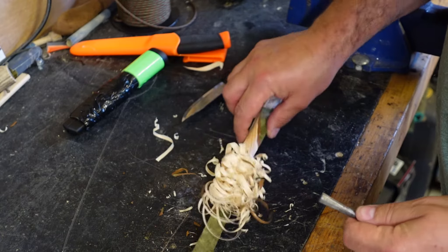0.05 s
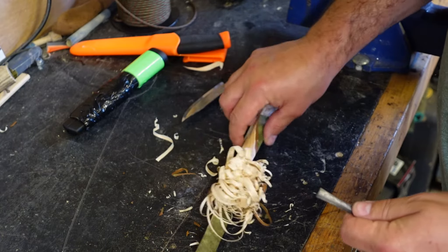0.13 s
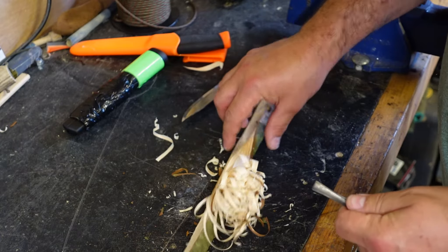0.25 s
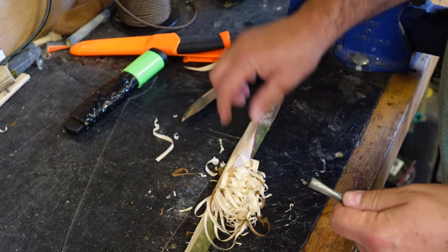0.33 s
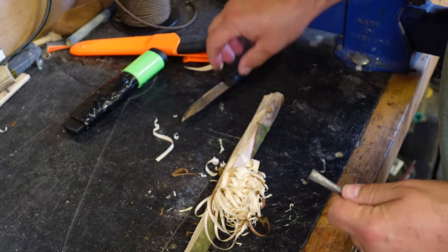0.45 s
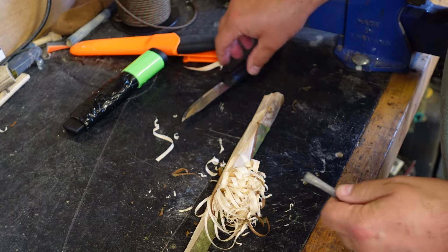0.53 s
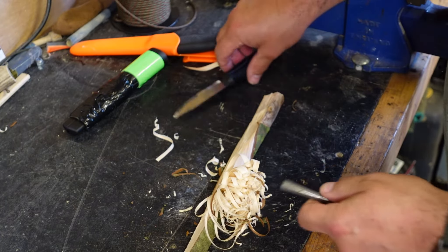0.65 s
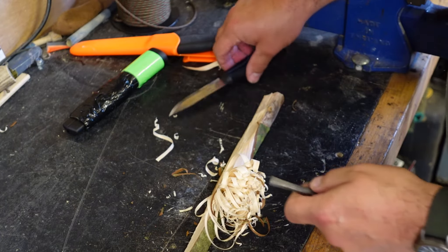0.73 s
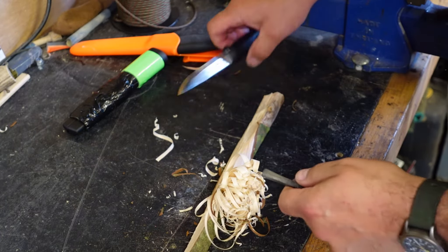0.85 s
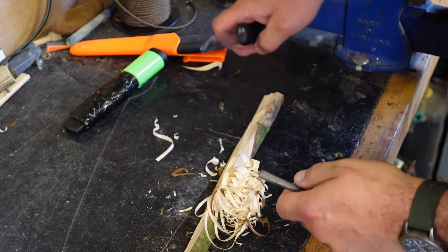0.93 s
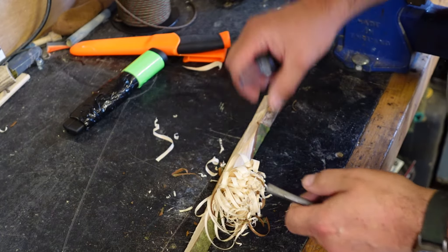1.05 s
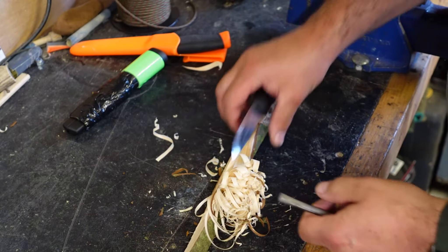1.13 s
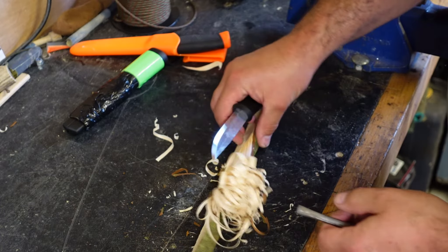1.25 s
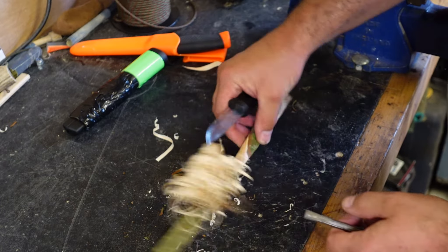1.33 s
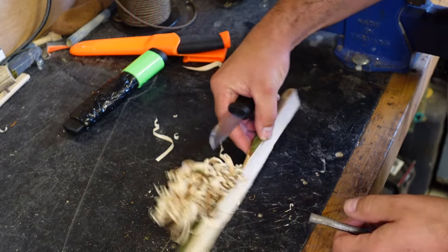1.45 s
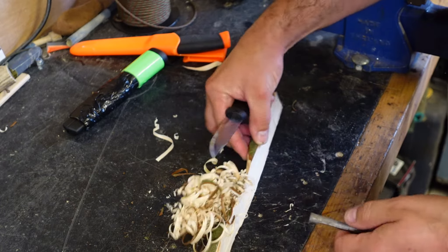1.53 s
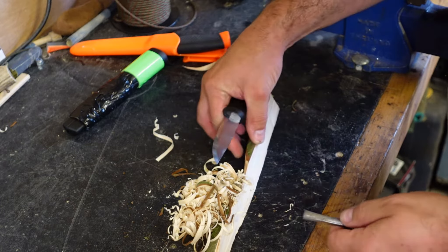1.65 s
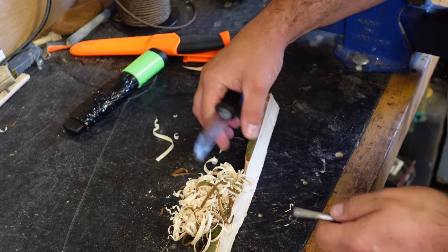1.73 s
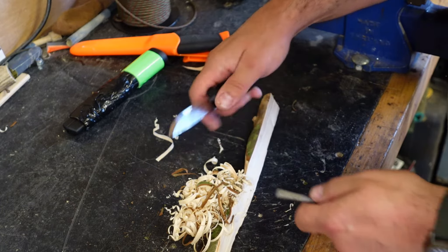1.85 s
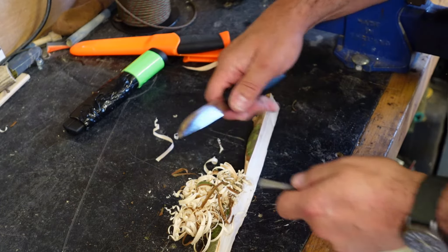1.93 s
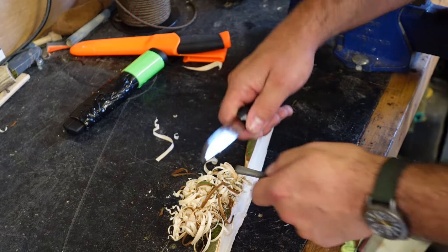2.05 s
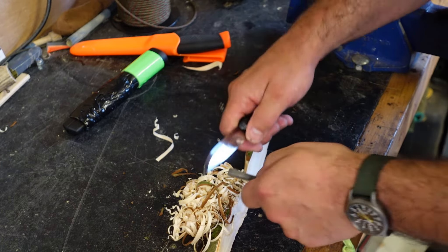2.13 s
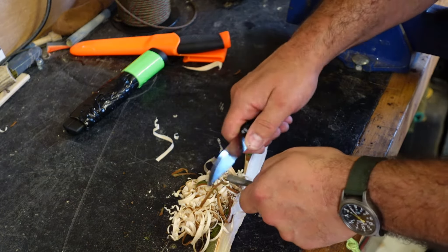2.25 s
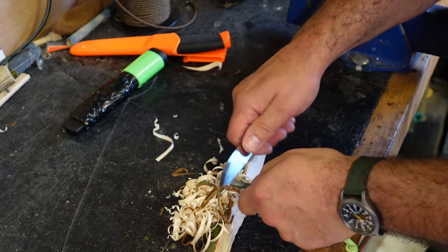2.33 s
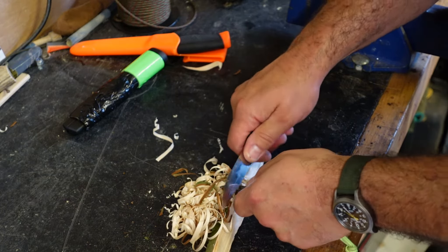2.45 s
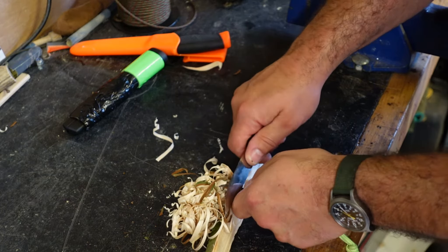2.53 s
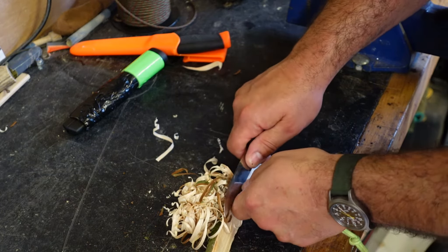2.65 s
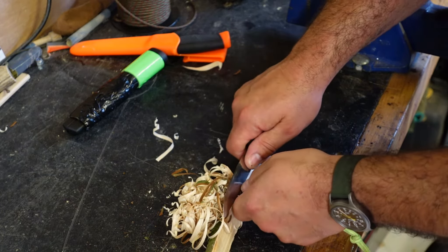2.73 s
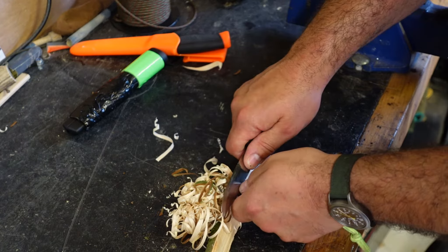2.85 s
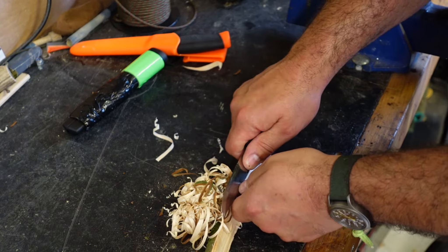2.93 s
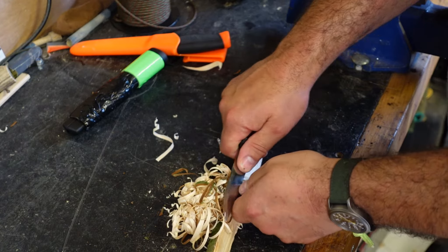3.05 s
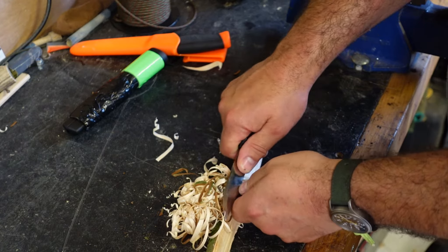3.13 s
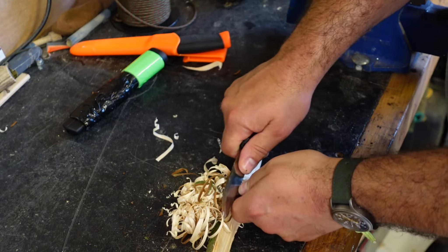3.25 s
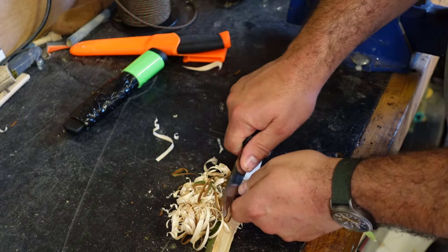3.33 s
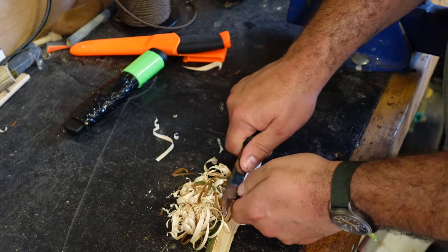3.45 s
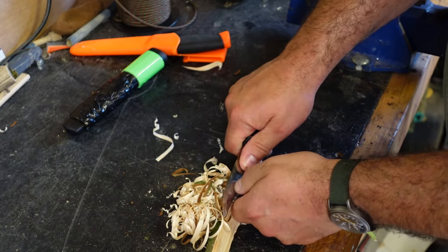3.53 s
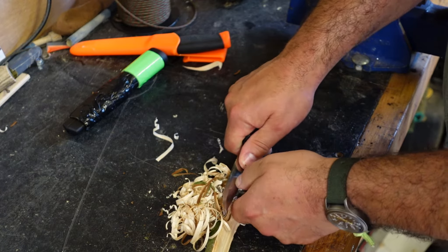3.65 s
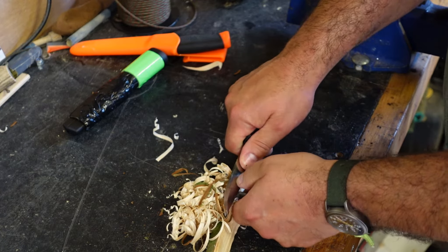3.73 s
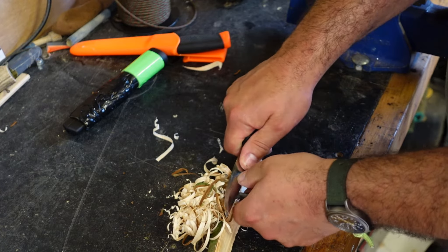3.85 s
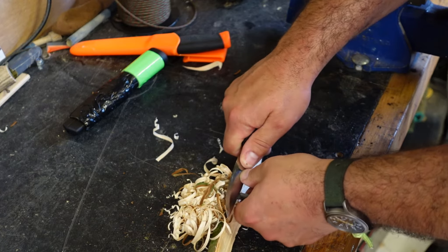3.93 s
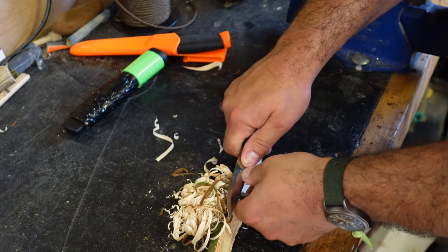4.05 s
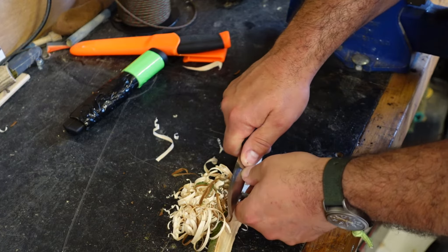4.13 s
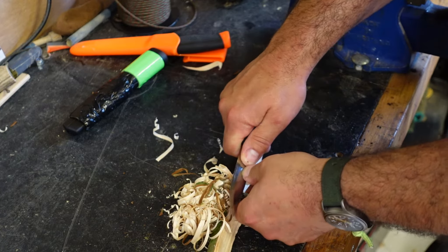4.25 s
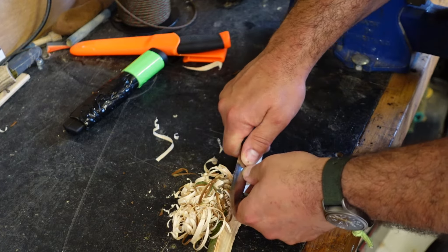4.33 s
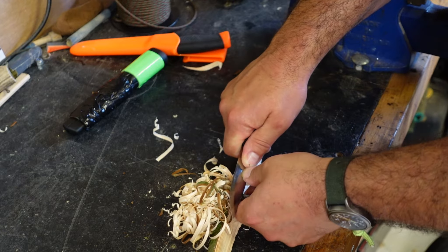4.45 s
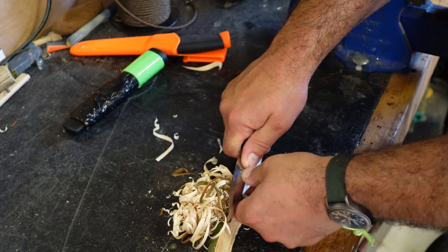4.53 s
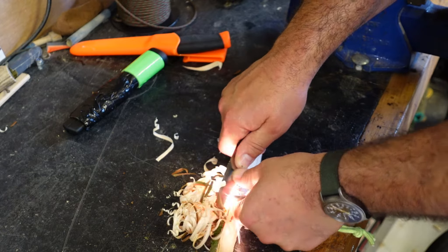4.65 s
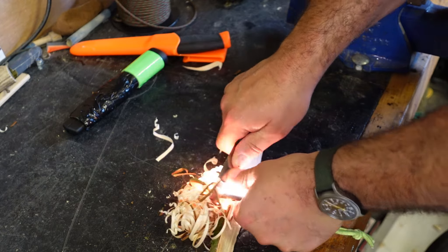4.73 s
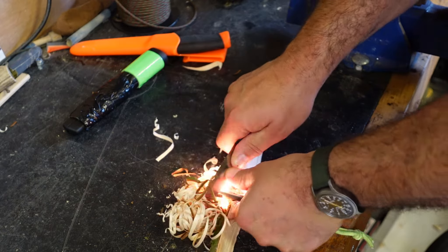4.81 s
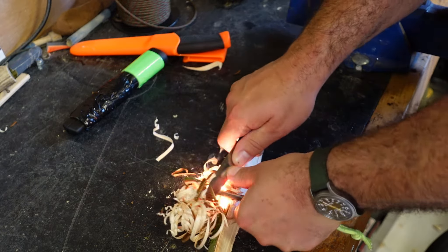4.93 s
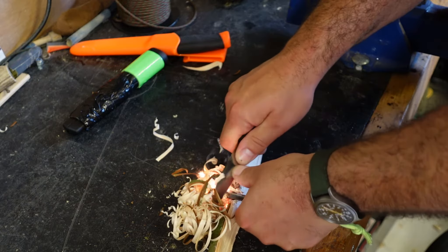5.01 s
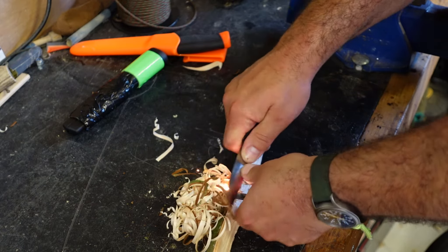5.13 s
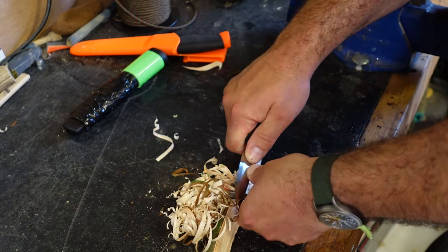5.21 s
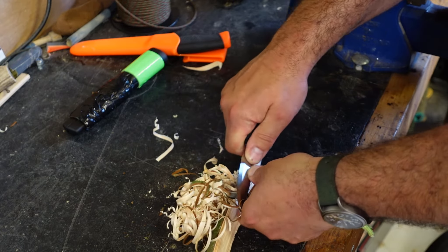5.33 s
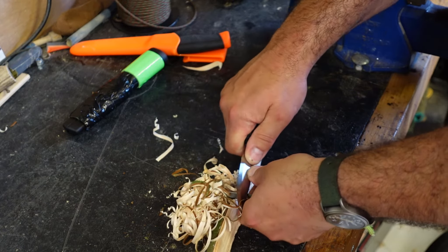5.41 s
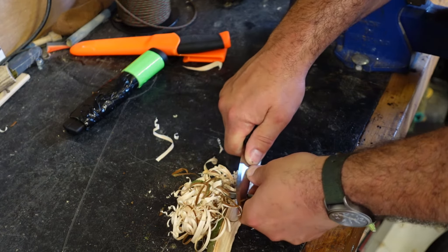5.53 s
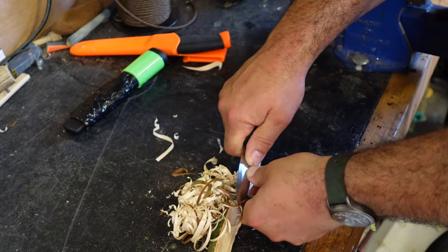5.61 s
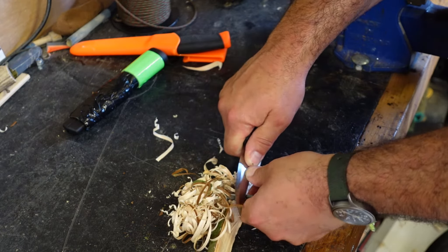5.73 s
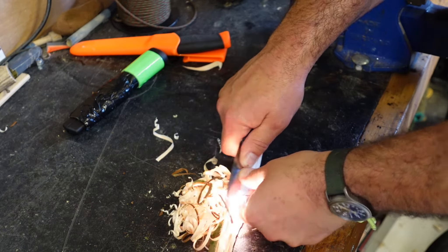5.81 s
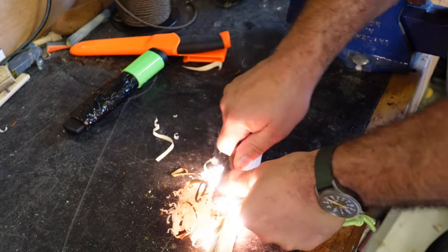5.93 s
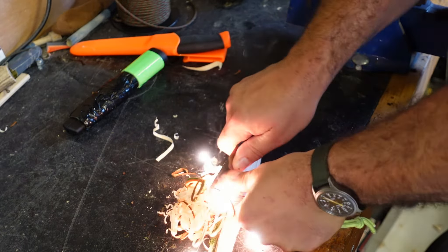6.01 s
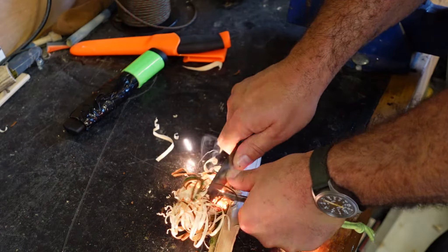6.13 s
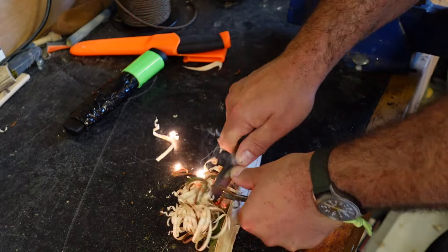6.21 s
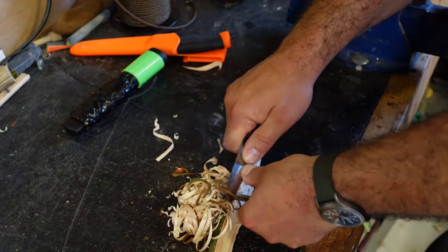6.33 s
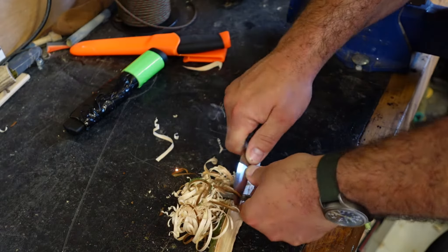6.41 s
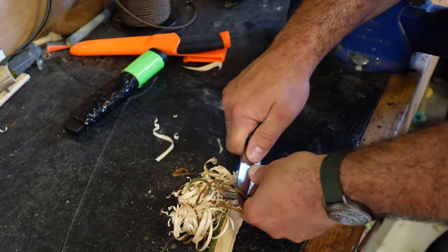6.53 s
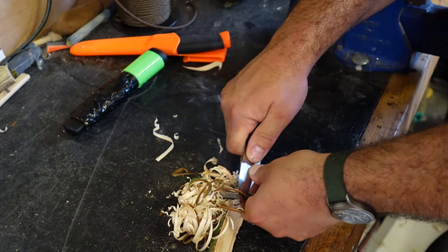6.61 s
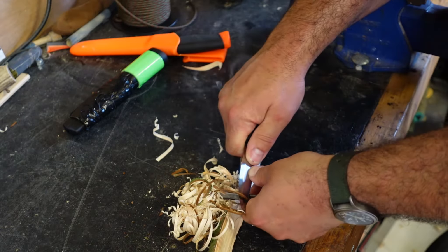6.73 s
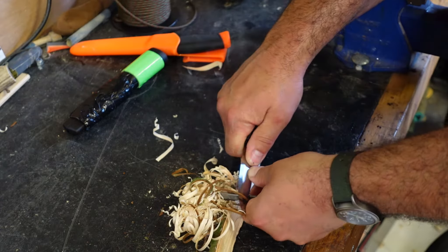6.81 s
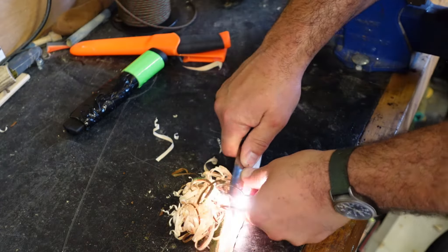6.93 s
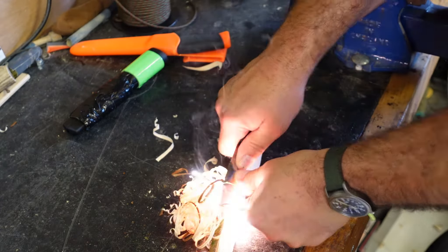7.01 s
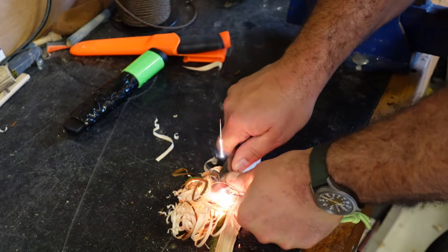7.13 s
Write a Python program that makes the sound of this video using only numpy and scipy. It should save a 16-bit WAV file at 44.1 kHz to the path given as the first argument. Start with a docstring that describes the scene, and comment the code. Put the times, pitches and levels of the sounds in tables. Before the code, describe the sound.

Close stereo in a small, quiet workshop. A dry wooden stick slides over a rubber-topped bench with brief hiss and light knocks, twice. Then a steel blade shifts among curled shavings with faint crisp rustles and tiny ticks. Finally the knife spine is dragged hard down a spark rod three times, each a loud, bright, jerky rasp with wood and steel ringing shortly, small crackles between.

```python
"""Knife spine on a spark rod

On a rubber-topped workbench a dry feathered stick is slid and set down, a knife is lined up among the shavings,
then its spine is dragged hard down a spark rod three times. Uneven jerks of gritty noise ring blade, rod, stick
and bench as banks of decaying modes; slides, rustles, knocks and ticks drive the same kinds of modes with noise.
A faint hollow hum, chirps and room tone lie behind, in a small quiet workshop with a close stereo microphone."""
import sys
import numpy as np
from scipy import signal
from scipy.fft import rfft, irfft
from scipy.io import wavfile
from scipy.ndimage import uniform_filter1d

SR = 44100
rng = np.random.default_rng(int(sys.argv[2]) if len(sys.argv) > 2 else 0)


def gain_from_decibels(decibels):
    """Convert decibel values to linear amplitude factors."""
    exponent = np.asarray(decibels, float) / 20
    return 10 ** exponent


def materialize(psi):
    """Save the field psi as 16-bit PCM at rate SR to the path in sys.argv[1].

    A 1-D psi becomes a single channel; in a 2-D psi each row is a channel.
    """
    bounded = np.clip(np.atleast_2d(psi).T, -1, 1)
    quanta = np.round(bounded * 32767).astype(np.int16)
    wavfile.write(sys.argv[1], SR, quanta)


N = 316197
T = np.arange(N) / SR  # time in seconds

# Blade held among the shavings or against the rod. Each row: mode in Hz, relative level in dB, t60 in seconds.
BLADE_MODES = [(2944, -5.5, 0.027), (3396, -3, 0.0082), (3994, 2, 0.011), (4370, -2, 0.0043),
               (4560, 4.5, 0.0097), (5050, -2, 0.0018), (5610, -7, 0.086), (6520, -38, 0.036),
               (8440, -8, 0.0095), (9200, -6, 0.008)]
# Stick pressed by the work, low to high. Each row: mode in Hz, relative level in dB, t60 in seconds.
STICK_MODES = [(543, -11, 0.047), (652.5, -6, 0.046), (900, -1, 0.013), (1148, 1.5, 0.029),
               (1207.5, 0, 0.012), (1519, 3, 0.018), (1780, 1.5, 0.031), (2317, 2, 0.0059)]
# Upper wood ring of the stick. Each row: mode in Hz, relative level in dB, t60 in seconds.
STICK_TOP_MODES = [(2620, 6, 0.036), (3400, -18, 0.033), (3600, -4, 0.06), (3953, 9.5, 0.017),
                   (4920, 0, 0.013), (5450, -5.5, 0.068), (7100, -9, 0.027)]
# Stick lying loose. Each row: mode in Hz, relative level in dB, t60 in seconds.
STICK_LOOSE_MODES = [(585, -5, 0.026), (658, 2, 0.044), (815, -3, 0.01), (1087, -3, 0.046),
                     (1245, -1.5, 0.022), (1472, -0.5, 0.017), (1594, -1, .03), (2030, -9, 0.0226)]
# Bench top. Each row: mode in Hz, relative level in dB, t60 in seconds.
BENCH_MODES = [(76.5, -16.5, .12), (90.2, -10.5, 0.31), (127, -5, 0.099), (245, -4, 0.024),
               (382, -5, 0.014), (491, -4, 0.054)]
# Tone of wood rubbing or cracking on the mat. Each row: frequency in Hz, gain in dB.
RUB_TONE = [(1500, -24), (3000, -9.5), (4500, -6.5), (5800, -2), (7500, -8.5), (11000, -9), (16000, -14.5)]
# Tone of crisp shavings and bright snaps. Each row: frequency in Hz, gain in dB.
CRISP_TONE = [(1200, -17.5), (2200, -11.5), (3500, -3), (5500, 2.5), (9000, 0.5), (13000, -1), (16000, -8)]


def unit(x):
    """Scale to rms 1."""
    return x / np.sqrt(np.mean(x ** 2))


def colour(x, points):
    """Causal filter through (Hz, dB) points, from the cepstrum of the log gain."""
    hz, db = np.transpose(points)
    bin_hz = np.arange(2049) * SR / 4096
    log_gain = np.interp(np.log(bin_hz + 1), np.log(hz), db) * np.log(10) / 20
    cepstrum = irfft(log_gain)
    # folding the cepstrum forward in time gives minimum phase
    cepstrum[1:2048] *= 2
    cepstrum[2049:] = 0
    return signal.fftconvolve(x, irfft(np.exp(rfft(cepstrum))))[:N]


def ring(x, modes):
    """Sum of decaying resonances, neighbours in opposite phase, scaled to unit energy."""
    t = T[:SR // 2]
    response = 0
    for k, (hz, db, t60) in enumerate(modes):
        decay = np.exp(-np.log(1000) * t / t60) / np.sqrt(t60)  # short modes start stronger
        response = response + (-1) ** k * gain_from_decibels(db) * np.sin(2 * np.pi * hz * t) * decay
    return signal.fftconvolve(x, response / np.sqrt(np.sum(response ** 2)))[:N]


def tracks(tables):
    """Turns the dB columns of (s, dB, ..) tables into gains over time, silent outside each table's span."""
    out = 0
    for table in tables:
        s, *columns = np.transpose(table)
        on = uniform_filter1d(1. * ((T > s[0]) & (T < s[-1])), size=300)  # soft edges
        out = out + on * gain_from_decibels(np.array([np.interp(T, s, db) for db in columns]))
    return out


def grit(jerks_per_s, jerk_db, jerk_s, grain_db):
    """Stick-slip friction: sharp grains of uneven size, swelling at each jerk and dying after it."""
    jerk_size = gain_from_decibels(jerk_db + 4 * rng.standard_normal(N))
    jerks = (rng.random(N) < jerks_per_s / SR) * jerk_size
    drag = 1 + signal.lfilter([1], [1, -np.exp(-1 / (jerk_s * SR))], jerks)
    drag = uniform_filter1d(drag, size=60)  # the edge takes a moment to bite
    grains = rng.standard_normal(N) * gain_from_decibels(grain_db * rng.exponential(size=N))
    return unit(drag * grains)


def shuffle(force):
    """The same jerks with other grain signs: the hiss at the edge, apart from what is felt in the body."""
    return force * rng.choice([-1., 1.], N)


def blows(table, burst_s):
    """A short decaying noise crunch per row, and a copy weighted by each further column."""
    out = np.zeros((len(table[0]) - 1, N + 600))
    crunches = rng.standard_normal((len(table), 600)) * np.exp(-T[:600] / burst_s)
    for (s, db, *above), crunch in zip(table, crunches):
        i = int(s * SR)
        gains = gain_from_decibels(db + np.array([0, *above]))
        out[:, i:i + 600] += gains[:, None] * crunch
    return out[:, :N]


def strokes():
    """The spine tears the rod; the same jerks ring the steel and the stick, and the slow push reaches the bench."""
    # Each row: time in seconds, tearing in dB, then drive in dB above the tearing for the stick body,
    # the steel ring and the low push into stick and bench; the layers are trimmed below.
    hard_strokes = [
        [(4.57, -57, 1, 2.5, -10), (4.598, -34, -7, -3, -13), (4.638, -30, -7, -1, -15.5),
         (4.748, -25, -7, -7, -11), (4.872, -32.5, -10.5, -21, -11.5), (4.89, -30.5, -12, -26, -23),
         (4.902, -31.5, -7, -18, -14), (4.93, -27.5, -13, -15, -24), (4.98, -39.5, -12, -16.5, -38),
         (5.03, -46, -26, -16, -32)],
        [(5.76, -66, -8, -5, -3), (5.766, -52, -4, -5, -2), (5.796, -39.5, -14, -2, -17),
         (5.804, -40, 0, 0, -1.5), (5.834, -27, -15, -5, -17), (5.844, -27.5, -7.5, -4, -13),
         (5.932, -25.5, -5.5, -5.5, -14.5), (6.092, -26.5, -11, -20, -19), (6.118, -46, -2, -12, -3),
         (6.16, -42, -19, -15, -26)],
        [(6.89, -55, -8, -8, -7), (6.902, -63, -3, -5, -4), (6.912, -37.5, -9, -12, -11),
         (6.93, -49.5, -4, -6, 1.5), (6.938, -37.5, -5, -10, -6.5), (6.976, -33, -7, -14, -14.5),
         (7.008, -26.5, -6, -3.5, -9.5), (7.102, -27, -4, -5, -14.5), (7.156, -26.5, -11, -8, -23),
         (7.17, -31, -6, -8, -13)],
    ]
    # Tone of the tearing edge. Each row: frequency in Hz, gain in dB.
    tear_tone = [(1500, -19.5), (2500, -9), (3500, -7), (5200, -5.5), (8000, -7), (11000, -9.5),
                 (13500, -13.5), (16000, -18)]
    # Spark rod. Each row: mode in Hz, relative level in dB, t60 in seconds.
    rod_modes = [(1730, -14, 0.0083), (4410, -53, 0.012), (4600, 2.5, 0.012), (4760, 0, 0.011)]
    tear, body, sing, push = tracks(hard_strokes)
    force = grit(jerks_per_s=80.0, jerk_db=0.0, jerk_s=0.0025, grain_db=0.1)
    felt = force * tear
    edge = gain_from_decibels(-1.0) * unit(colour(shuffle(force), tear_tone)) * tear
    blade = gain_from_decibels(-8.5) * ring(felt * sing, BLADE_MODES)
    rod = gain_from_decibels(-2.5) * ring(felt * sing, rod_modes)
    low_wood = gain_from_decibels(-0.5) * ring(felt * push, STICK_MODES[:2])
    wood = gain_from_decibels(-0.1) * ring(felt * body, STICK_MODES[2:])
    bench = gain_from_decibels(-3.5) * ring(felt * push, BENCH_MODES)
    return edge + blade + rod + low_wood + wood + bench


def slides():
    """Wood dragged on rubber: fine stick-slip hiss that rings the loose stick."""
    # Each row: time in seconds, rub in dB, wood body drive in dB above the rub, both before the trims below.
    mat_slides = [
        [(0.05, -75, -18), (0.094, -55.5, -11), (0.194, -52, -28), (0.278, -47, -36), (0.292, -44, -39),
         (0.304, -52, -31), (0.314, -45, 17), (0.33, -53.5, -1.5), (0.5, -76.5, 5.5)],
        [(1.2, -116, 4), (1.22, -55.5, -25), (1.282, -56, -28), (1.362, -45, -8.5), (1.458, -72, -4),
         (1.478, -47, -19), (1.628, -55, -17), (1.634, -53.5, -7.5), (1.78, -78.5, 0)],
    ]
    rub, body = tracks(mat_slides)
    force = grit(jerks_per_s=90., jerk_db=-5., jerk_s=.005, grain_db=.8)
    hiss = gain_from_decibels(-1.5) * unit(colour(shuffle(force), RUB_TONE)) * rub
    top = gain_from_decibels(-11) * ring(force * rub, STICK_TOP_MODES)
    wood = gain_from_decibels(-1.0) * ring(force * rub * body, STICK_LOOSE_MODES)
    return hiss + top + wood


def rustles():
    """Blade and rod shift among curled shavings: jerky crisp noise rings the blade and the wood dully."""
    # Each row: time in seconds, rustle in dB, wood body drive in dB above the rustle, before the trims below.
    shaving_rustles = [
        [(2.41, -55, -1), (2.43, -52.5, -1), (2.47, -53.5, -10), (2.54, -43.5, -15), (2.67, -41.5, -18),
         (2.8, -54.5, -15), (2.89, -38, -15), (2.95, -52.5, -19), (2.96, -44.5, -19), (3.06, -62.5, -7),
         (3.09, -49.5, -18), (3.11, -56.5, -14), (3.3, -57.5, -6), (3.36, -49.5, -10), (3.41, -59, -5),
         (3.52, -50.5, -18), (3.56, -59, -10), (3.85, -52.5, -28), (3.91, -60, -8), (4.0, -54, -1),
         (4.04, -59.5, -9), (4.13, -68, -12), (4.17, -56, -3), (4.26, -64, 5), (4.46, -47, -17),
         (4.5, -54.5, -1.5), (4.55, -51.5, -21), (4.58, -50, 3)],
        [(5.0, -45.5, -4), (5.056, -40.5, -15), (5.076, -33.5, -22), (5.108, -38.5, -13), (5.116, -33.5, -12),
         (5.184, -51.5, -8), (5.382, -62, -8), (5.584, -60.5, -7), (5.594, -50.5, -17), (5.758, -60, -9),
         (5.772, -47, 8), (5.78, -50, -9)],
        [(6.13, -42, -11), (6.174, -44, -3.5), (6.192, -31.5, -6), (6.21, -41, -8.5), (6.45, -59.5, -11),
         (6.584, -57.5, -20), (6.642, -68, -10), (6.67, -61, -30), (6.72, -64.5, -12), (6.816, -61, -15),
         (6.836, -55, -9), (6.9, -53, 1)],
    ]
    crisp, body = tracks(shaving_rustles)
    force = grit(jerks_per_s=80., jerk_db=-4., jerk_s=.005, grain_db=1.1)
    crackle = gain_from_decibels(-2.5) * unit(colour(shuffle(force), CRISP_TONE)) * crisp
    blade = gain_from_decibels(-8) * ring(force * crisp, BLADE_MODES)
    wood = gain_from_decibels(-4) * ring(force * crisp * body, STICK_MODES)
    return crackle + blade + wood


def knocks():
    """The stick knocks the bench: a contact crack excites both ranges of the loose stick."""
    # Each row: start in seconds, crack in dB, then drive in dB above the crack for the upper wood ring
    # and the wood body, all before the trims below.
    bench_knocks = [(0.0857, -33.5, -25, -16.5), (0.107, -39, -11.5, -24), (0.1444, -32, -23, -31),
                    (0.166, -40, -24, -12), (0.2867, -50, -15, -32), (0.3122, -25, 0.5, -20),
                    (0.355, -34, -21, -13), (0.416, -53, -12, 4), (0.635, -49.5, -16.5, -12),
                    (1.2184, -49, -21, -16), (1.3248, -47, -8, -10), (1.3684, -25, -23, -26),
                    (1.4789, -23.5, -16.5, -34), (1.507, -39.5, -16, -26), (1.5308, -35.5, -11.5, -25),
                    (1.5558, -39, -18, -30), (1.6348, -33, -10, -4.5), (1.663, -41, -9, -9),
                    (2.2293, -48, -11, -6), (2.4274, -37, -8.5, -5)]
    hit, top, body = blows(bench_knocks, burst_s=0.00066)
    crack = gain_from_decibels(4.0) * colour(hit, RUB_TONE)
    return crack + gain_from_decibels(12.5) * ring(top, STICK_TOP_MODES) + gain_from_decibels(8.5) * ring(body, STICK_LOOSE_MODES)


def ticks():
    """Steel edge and snapping shavings: bright snaps a few ms long ring the blade, with a little wood under them."""
    # Each row: start in seconds, snap in dB, then drive in dB above the snap for the blade ring
    # and the wood body, all before the trims below.
    edge_ticks = [(2.7741, -35, -20, -21), (2.8413, -39.5, -2, -11), (2.8953, -34, -3, -14),
                  (2.9572, -38, -16, -22), (3.0126, -45, 1, -21), (3.0682, -44.5, -4, -14),
                  (3.1567, -43.5, -15, -17), (3.2013, -41, -20, -19), (3.3416, -41.5, -7, -21),
                  (3.4331, -40, -12, -4.5), (3.457, -42, -10, -21), (3.5094, -43, -11, -18),
                  (3.673, -38.5, -22, -26), (3.6877, -40.5, -11, -16), (3.728, -41, -14, -24),
                  (3.8063, -32, -31, -35), (3.8234, -43, -20, -29), (3.841, -34, -25, -32),
                  (3.8546, -32.5, -37, -34), (3.9784, -40.5, -8, -23), (3.9983, -41.5, -2, -9),
                  (4.165, -41.5, -24, -26), (4.334, -37.5, -25, -20), (4.375, -36, -32, -29),
                  (4.4347, -43, -11, -22), (4.4694, -35, -5, -9), (4.5257, -47, -16, -27),
                  (4.5537, -39.5, -2, -14), (4.5921, -21, -3.5, -15.5), (4.6243, -19, -1, -7),
                  (4.6811, -23, 4, -4), (4.7386, -18.5, 2, -23), (4.8859, -13, -33, -22),
                  (4.928, -17.5, -23, -11), (5.033, -27.5, -25, -25), (5.0592, -28, -19, -20),
                  (5.0735, -24.5, -22, -15), (5.1168, -17.5, -38, -19), (5.386, -43, -26, -26),
                  (5.4703, -43.5, -22, -22.5), (5.5418, -42, -21, -18), (5.595, -35, -18, -33),
                  (5.618, -48, -14, -22), (5.66, -36.5, -12, -28), (5.728, -47, -6, -11),
                  (5.7678, -33.5, -2.5, -9), (5.7908, -24.5, -2, -9), (5.814, -31, 7, -10),
                  (5.8292, -15.5, -19, -20), (6.0162, -13, -9, -14), (6.1494, -23.5, -19, -18),
                  (6.1833, -24, -19, -22), (6.2647, -32, -11, -17), (6.307, -33, -22, -19),
                  (6.3346, -35, -16, -24), (6.571, -37.5, -17, -28), (6.7098, -44, -6, -5),
                  (6.837, -38, 2, -11.5), (6.8775, -32.5, -8, -6), (6.9102, -32.5, 2.5, -2),
                  (6.9367, -30.5, -1, -12), (7, -20.5, -0.5, -7), (7.1174, -29, 1, -14),
                  (7.1402, -14, -7, -4.5)]
    hit, blade, body = blows(edge_ticks, burst_s=0.0034)
    snap = gain_from_decibels(-4) * colour(hit, CRISP_TONE)
    return snap + gain_from_decibels(-1.0) * ring(blade, BLADE_MODES) + gain_from_decibels(-1.0) * ring(body, STICK_MODES)


def scuffs():
    """The stick scuffs the mat under the hand: brief dull swells of noise that sound only the wood body."""
    # Each row: time of the peak in seconds, level in dB, half length in seconds.
    mat_scuffs = [(0.696, -66, 0.052), (1.346, -49.5, 0.014), (2.896, -56, 0.0076), (4.217, -62, 0.018),
                  (4.31, -58.5, 0.021), (4.48, -66, 0.031)]
    press = sum(gain_from_decibels(db) * np.exp(-((T - s) / half_s) ** 2) for s, db, half_s in mat_scuffs)
    return ring(rng.standard_normal(N) * press, STICK_LOOSE_MODES)


def hands():
    """The weight of a hand shifts on the bench: soft noise swells rumble in the bench modes."""
    # Each row: time of the peak in seconds, level in dB, fade time constant in seconds.
    hand_shifts = [(.09, -59.5, 0.039), (.18, -68, .1), (.315, -69, 0.087), (.64, -61.5, 0.069),
                   (.7, -58, 0.02), (1.23, -64, 0.032), (1.48, -69, 0.11), (1.65, -70, 0.15),
                   (2.24, -72, 0.081), (2.43, -62, 0.022), (3.19, -67.5, 0.03), (3.43, -69.5, 0.092),
                   (4.01, -70, 0.025), (4.19, -62.5, 0.054), (4.24, -68, .05), (4.31, -75, .05),
                   (6.2, -78, .08), (6.85, -65.5, .05)]
    rise_s = 0.01
    weight = 0
    for s, db, fade_s in hand_shifts:
        weight = weight + gain_from_decibels(db) * np.exp(np.minimum((T - s) / rise_s, (s - T) / fade_s))
    return ring(rng.standard_normal(N) * weight, BENCH_MODES)


def lift():
    """The knife drawn off the mat sings faintly in its free modes, fading in and out over 30 ms."""
    # Swells of the blade ring and of the thin high ring. Each holds: start in seconds, length in seconds, level in dB.
    ring_swell = (.84, 0.386, -74)
    tip_swell = (.68, 0.16, -76)
    # Blade held by the handle only. Each row: mode in Hz, relative level in dB, t60 in seconds.
    free_modes = [(3320, -3.5, 0.024), (3580, -4, .06), (3980, -5, 0.044)]
    # Thin high ring of the blade. Each row: mode in Hz, relative level in dB, t60 in seconds.
    tip_modes = [(7770, 0, 0.028)]

    def gate(s, length_s, db):
        """Level held between two straight fades."""
        return gain_from_decibels(db) * np.clip(np.minimum(T - s, s + length_s - T) / .03, 0, 1)

    force = rng.standard_normal(N)
    return ring(force * gate(*ring_swell), free_modes) + ring(force * gate(*tip_swell), tip_modes)


def hum():
    """A hollow low drone that comes and goes: noise in three close resonances."""
    # Each row: time in seconds, level in dB before the trim below.
    hum_levels = [
        [(0.62, -70), (0.662, -65), (1.086, -70), (1.16, -80), (1.364, -65.5), (1.742, -71), (1.82, -80)],
        [(2.95, -85), (3.254, -65), (3.448, -88), (3.696, -70), (3.882, -78), (4.044, -68.5), (4.1, -97)],
        [(5.12, -71), (5.148, -75), (5.234, -64), (5.738, -71.5), (5.748, -82), (5.766, -62), (5.78, -62)],
        [(6.12, -59), (6.164, -63), (6.188, -60), (6.206, -62), (6.282, -62), (6.488, -85), (6.5, -94)],
    ]
    # Hollow resonances. Each row: mode in Hz, relative level in dB, t60 in seconds.
    hollow_modes = [(274, -5, 0.049), (317, -0.5, 0.094), (382, -5.5, 0.063)]
    return gain_from_decibels(1.5) * ring(rng.standard_normal(N) * tracks(hum_levels)[0], hollow_modes)


def chirps():
    """Faint smeared distant chirps: bands of high noise that start quickly and fade."""
    # Each row: start in seconds, length in seconds, low edge in Hz, high edge in Hz, level in dB.
    far_chirps = [(1.997, 0.067, 5560, 7600, -60), (6.654, 0.075, 5800, 7500, -59.5)]
    out = 0
    for s, length_s, low_hz, high_hz, db in far_chirps:
        band_pass = signal.butter(6, [low_hz, high_hz], "band", fs=SR, output="sos")
        band = signal.sosfilt(band_pass, rng.standard_normal(N))
        age = np.clip((T - s) / length_s, 0, 9)
        out = out + gain_from_decibels(db) * unit(band) * np.minimum(age * 12, 1) * np.exp(-age ** 1.2)
    return out


def room(x):
    """Diffuse noise tail of the workshop, shared in the bass, separate at each ear in the treble."""
    bass_t60_s, treble_t60_s, build_up_s = 0.19, 0.056, 0.0091
    room_db = -12
    t = T[:SR // 2]
    low_pass = signal.butter(1, 2500, fs=SR, output="sos")
    tails = []
    for noise in rng.standard_normal((2, len(t))):
        bass = signal.sosfilt(low_pass, noise)
        tail = bass * gain_from_decibels(-60 * t / bass_t60_s) + (noise - bass) * gain_from_decibels(-60 * t / treble_t60_s)
        tail = tail * np.minimum(t / build_up_s, 1)
        tails.append(signal.fftconvolve(x, tail / np.sqrt(np.sum(tail ** 2)))[:N])
    mid, side = tails
    side = colour(side, [(60, -30), (150, -16), (500, -8), (3000, -4), (7000, 1), (12000, 7)])
    return gain_from_decibels(room_db) * (mid + side * np.array([[1], [-1]]))


def air():
    """Room tone and hiss as coloured noise in mid and side, with a faint steady whir ringing in the middle."""
    # Tone of the air. Each row: frequency in Hz, gain in dB.
    air_tone = [(18, -70), (30, -40.5), (81, -12.5), (161, -9.5), (233, -4), (280, -1.5), (461, -4),
                (554, -1.5), (988, -4.5), (1190, -7.5), (1810, -6), (2410, -11), (7670, -16.5), (9970, -18),
                (16000, -20.5)]
    # Steady narrow whir. Each row: mode in Hz, relative level in dB, t60 in seconds.
    whir_modes = [(1590, 0, 0.022)]
    air_db = -68.5
    noise = rng.standard_normal((3, N))
    mid = unit(colour(noise[0], air_tone)) + gain_from_decibels(-5.0) * ring(noise[1], whir_modes)
    side = unit(colour(noise[2], air_tone))
    side = colour(side, [(100, 2), (400, 2.5), (2000, 5.0), (12000, -4.0)])  # stereo width by frequency
    return gain_from_decibels(air_db) * (mid + side * np.array([[1], [-1]]))


def scene():
    """Everything on the bench leans a little left, more so in the treble; room and air surround it."""
    # Left minus right. Each row: frequency in Hz, difference in dB.
    left_lean = [(200, 0), (1000, .5), (4000, 1.3), (12000, 2.3)]
    near = strokes() + slides() + rustles() + knocks() + ticks()
    near = near + scuffs() + hands() + lift() + hum() + chirps()
    left = colour(near, [(hz, db / 2) for hz, db in left_lean])
    right = colour(near, [(hz, -db / 2) for hz, db in left_lean])
    return np.array([left, right]) + room(near) + air()


def band_limit(x):
    """A steep low-pass at the top of the band."""
    return signal.sosfilt(signal.butter(12, 16820, fs=SR, output="sos"), x)


def record(dry):
    """The microphone drops the deep bass and the top."""
    bass_cut = signal.butter(3, 65, "high", fs=SR, output="sos")
    top_cut = signal.ellip(8, .5, 60, 15900, fs=SR, output="sos")
    mix = signal.sosfilt(top_cut, signal.sosfilt(bass_cut, dry))
    return band_limit(mix)


dry = scene()
out = record(dry)
materialize(out)
```